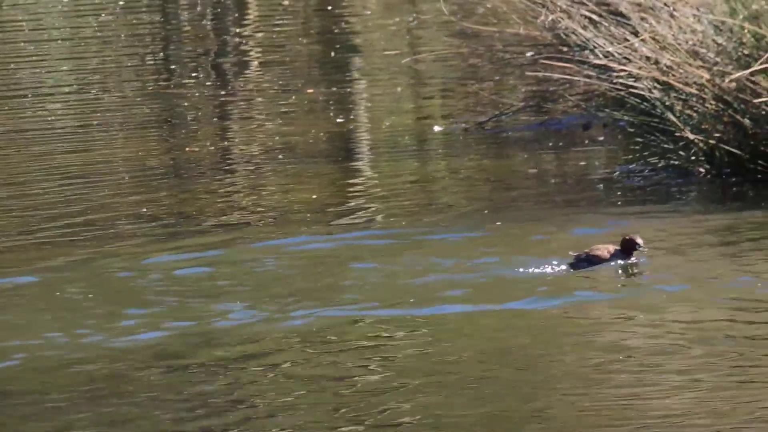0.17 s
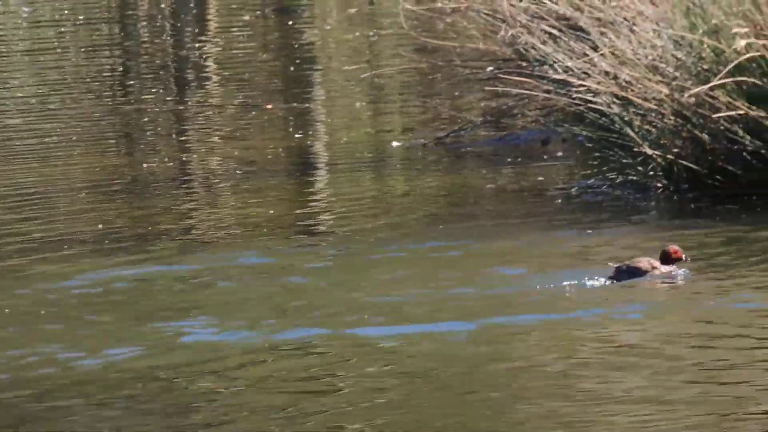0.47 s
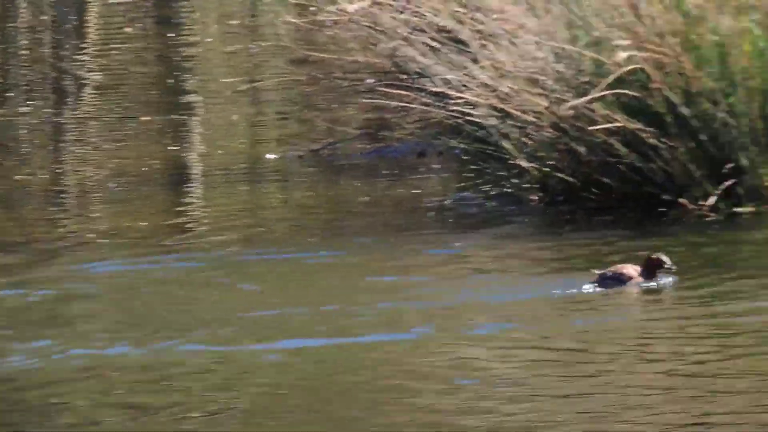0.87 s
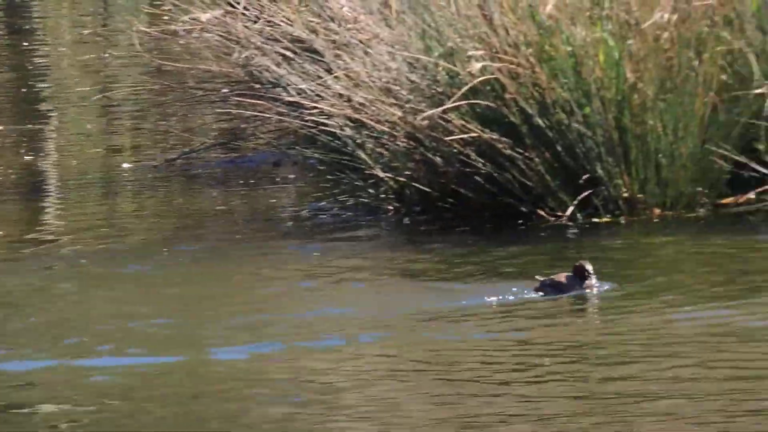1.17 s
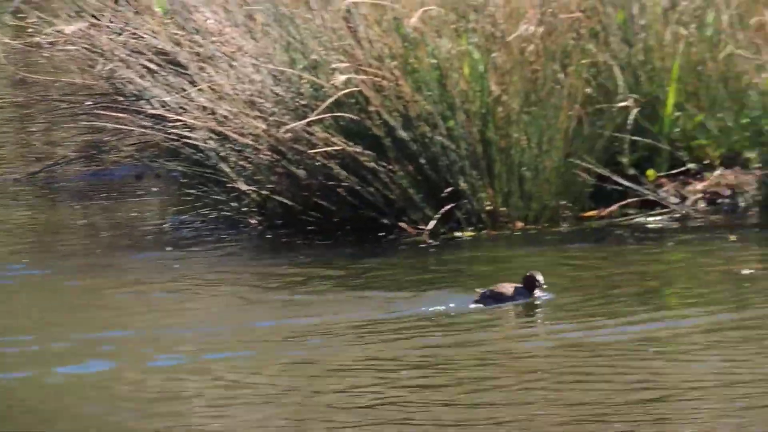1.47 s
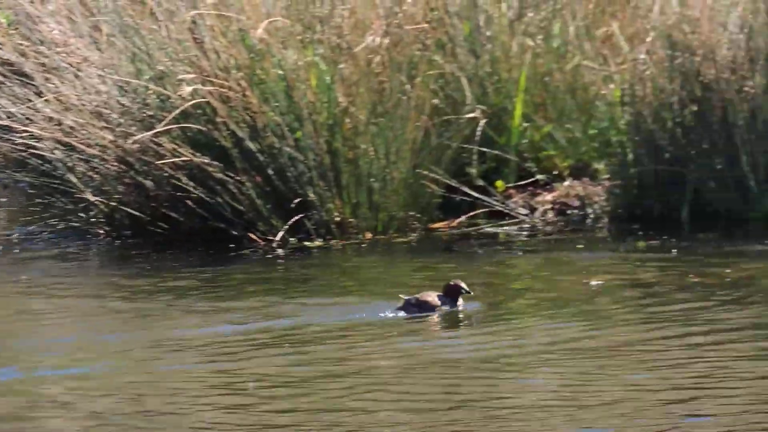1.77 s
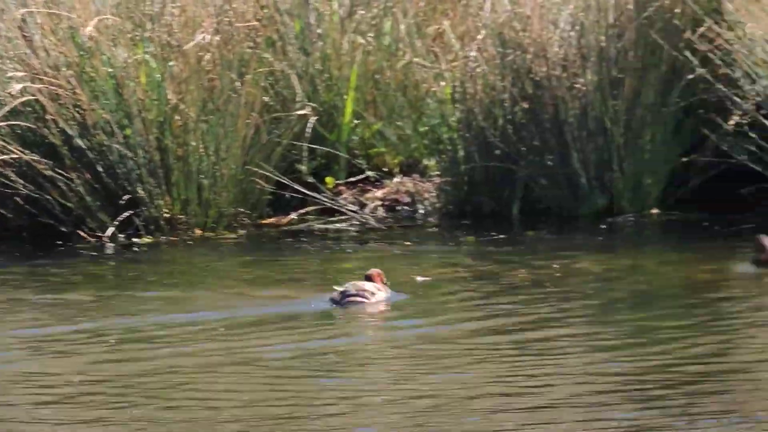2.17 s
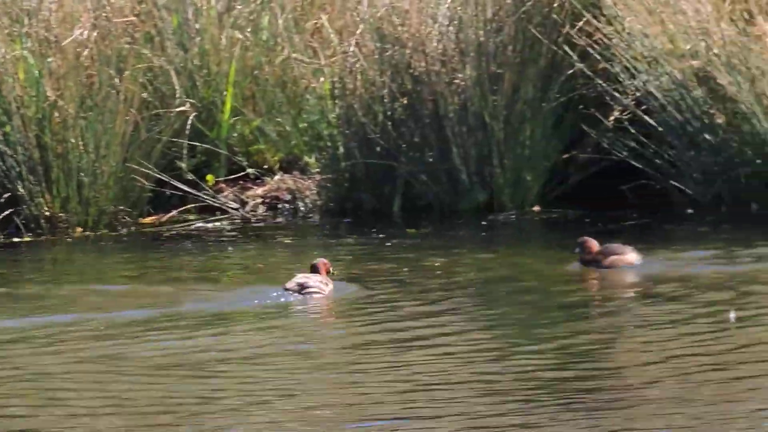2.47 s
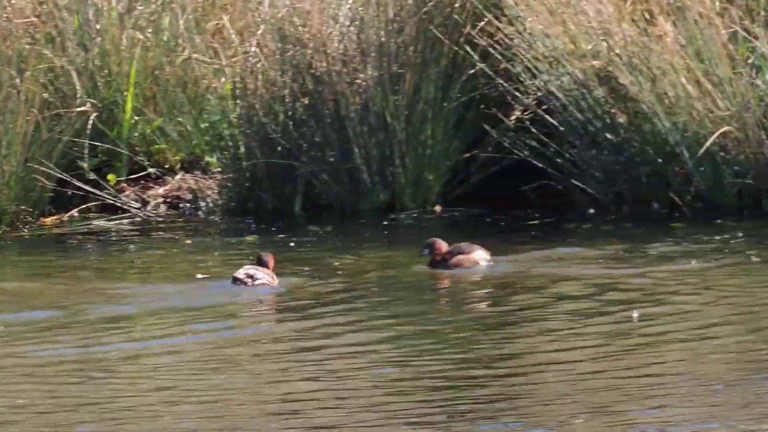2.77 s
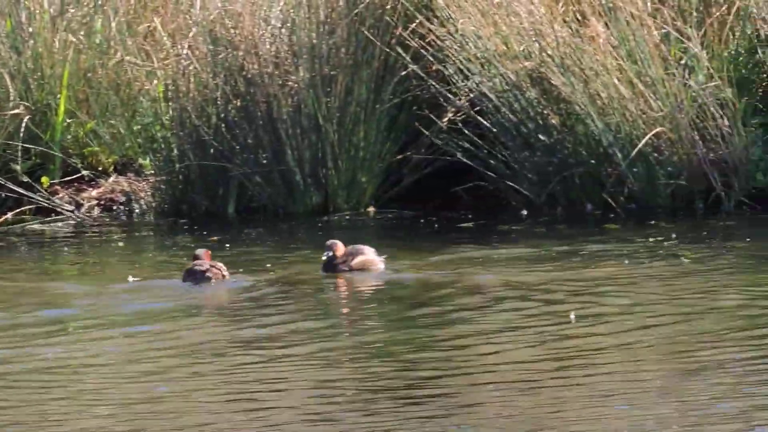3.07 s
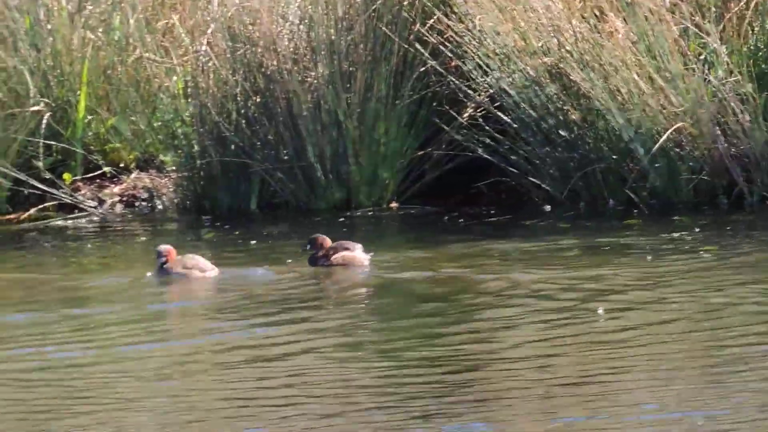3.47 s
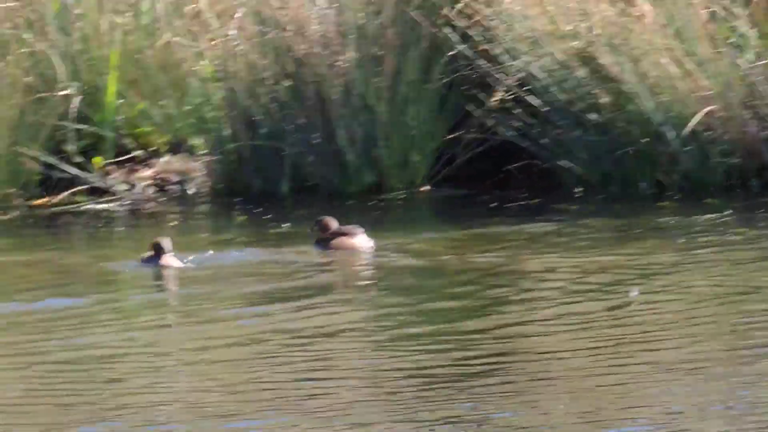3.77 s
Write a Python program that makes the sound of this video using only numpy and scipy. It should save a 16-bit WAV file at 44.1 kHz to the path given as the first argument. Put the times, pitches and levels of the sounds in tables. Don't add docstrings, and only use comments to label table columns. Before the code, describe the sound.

Two grebes trill a fast whinnying duet on a reedy pond, pause near the middle, then trill again to the end. Fainter birds join, distant traffic rumbles, and sharp plastic camera clicks sound close to the microphone.

```python
import sys
import numpy as np
from scipy import signal
from scipy.fft import rfft, irfft, next_fast_len
from scipy.io import wavfile
from scipy.ndimage import uniform_filter1d

SR = 44100
rng = np.random.default_rng(int(sys.argv[2]) if len(sys.argv) > 2 else 0)


def voltage_ratio(decibels):
    exponent = np.asarray(decibels, float) / 20
    return 10 ** exponent


def dump_mix(stems):
    frames = np.atleast_2d(stems).T
    limited = np.clip(frames, -1, 1)
    pcm = np.round(limited * 32767).astype(np.int16)
    wavfile.write(sys.argv[1], SR, pcm)


N = 173313


def unit(x):
    return x / np.sqrt(np.mean(x ** 2))


def walk(rate_hz):
    hold = int(SR / rate_hz)
    steps = np.repeat(rng.standard_normal(N // hold + 1), hold)
    return unit(uniform_filter1d(uniform_filter1d(steps, hold), hold)[:N])


def band(hz, width_hz):
    b, a = signal.iirpeak(hz, hz / width_hz, SR)
    return unit(signal.lfilter(b, a, rng.standard_normal(N)))


def response(points):
    p, size = np.array(points, float), next_fast_len(N + SR // 10)
    hz = np.arange(size // 2 + 1) * SR / size
    log_gain = np.interp(np.log(hz + 1), np.log(p[:, 0]), p[:, 1]) * np.log(10) / 20
    cepstrum = irfft(log_gain, size)
    cepstrum[1:size // 2] *= 2
    cepstrum[size // 2 + 1:] = 0
    return rfft(cepstrum), hz, size


def colour(x, points):
    log_spectrum, _, size = response(points)
    return irfft(rfft(x, size) * np.exp(log_spectrum), size)[..., :N]


# f/Hz, level/dB [dB per Hz]
TRAFFIC_SPECTRUM = [(20, 4), (55, 0.5), (130, -4), (220, -5.5), (800, 3), (1300, -10), (2900, -22),
                    (5200, -15), (9000, -24)]
# f/Hz, width/Hz, level/dB
ENGINE_DRONES = [(56.3, 10.6, -60.5), (81.7, 8.8, -59.5), (203, 5.6, -63), (230.6, 10, -69),
                 (346, 7.4, -63), (373.8, 8.4, -58), (566, 15, -60)]
TRAFFIC_DB, TRAFFIC_SIDE_DB = -45, -11.5


def traffic():
    roar, swell, sign = 0, walk(1.0), np.array([[1], [-1]])
    for hz in 25 * 2 ** np.arange(0, 9.1, .5):
        level = np.sqrt(hz) * voltage_ratio(.5 * swell + walk(8.7))
        side = voltage_ratio(TRAFFIC_SIDE_DB) * sign * band(hz, hz / 3)
        roar = roar + level * (band(hz, hz / 3) + side)
    roar = voltage_ratio(TRAFFIC_DB) * unit(colour(roar, TRAFFIC_SPECTRUM))
    drones = sum(voltage_ratio(db + 2 * walk(1)) * band(hz, width_hz) for hz, width_hz, db in ENGINE_DRONES)
    return roar + drones


# t/s, level/dB
TICKS = [
    (0.7048, -15.5),
    (0.7313, -18.5),
    (3.273, -20.5),
    (3.2853, -20.5),
]
# f/Hz, level/dB, t60/s
BODY_MODES = [(400, -12, .015), (1513, 0, .013), (3630, -12, .005), (5100, -6, .003), (8000, -8, .0015),
              (11500, -10, .001)]


def camera():
    out, t = np.zeros((2, N)), np.arange(SR // 20) / SR
    for start_s, db in TICKS:
        i = int(start_s * SR)
        for hz, mode_db, t60_s in BODY_MODES:
            detune = 1 + rng.standard_normal() / 40
            ring = voltage_ratio(db + mode_db - 60 * t / t60_s) * np.sin(2 * np.pi * hz * detune * t)
            port_db = np.array([[-5], [-4 + 2 * np.log2(hz / 1500)]])
            out[:, i:i + len(t)] += ring * voltage_ratio(port_db)
    return out


ROUGH_MOST = .19


def add_note(out, start_s, hz, env, partials_db, rough, bright, db):
    i, n = int(start_s * SR), min(len(hz), N - int(start_s * SR))
    rough = min(rough, ROUGH_MOST)
    wobble = uniform_filter1d(rng.standard_normal((2, 4096)), size=48, axis=1) * 7
    pitch_wobble, level_wobble = 1 + rough * wobble[:, :n] * np.array([[1 / 20], [1]])
    phase = 2 * np.pi * np.cumsum(hz[:n] * pitch_wobble) / SR
    gains = voltage_ratio(np.array(partials_db))
    note = 0
    for k, gain in enumerate(gains):
        note = note + gain * env[:n] ** (1 + bright * k) * np.sin((k + 1) * phase + k * k)
    out[i:i + n] += voltage_ratio(db) * note * level_wobble * np.sqrt(2 / np.sum(gains ** 2))


def arches(rows, partials_db, db, rise_s, fall_s, sag, flare, rough, bright):
    out, t = np.zeros(N), np.arange(-rise_s, fall_s, 1 / SR)
    env = np.clip(1 - (t / np.where(t < 0, rise_s, fall_s)) ** 4, 0, 1)
    arch = 1 - sag * t ** 2 / (1 + flare * t ** 2)
    for top_s, top_hz, level_db in rows:
        add_note(out, top_s - rise_s, top_hz * arch, env, partials_db, rough, bright, level_db + db)
    return out


def hooks(rows, partials_db, db, scoop, scoop_s, attack_s, release_s, rough):
    out = np.zeros(N)
    for start_s, length_s, hz, level_db, *over_db in rows:
        end_s = length_s + release_s
        t = np.arange(0, end_s, 1 / SR)
        env = np.clip(np.minimum(t / attack_s, (end_s - t) / release_s), 0, 1)
        overtone = np.arange(len(partials_db)) > 0
        tone_db = np.array(partials_db) + sum(over_db) * overtone
        pitch = hz * (1 - scoop * np.exp(-t / scoop_s))
        add_note(out, start_s, pitch, env, tone_db, rough, .1, level_db + db)
    return out


# t/s [top], f/Hz [top], level/dB
LOW_FAR_ARCHES = [(1.734, 755, -47), (1.778, 910, -50), (2.028, 803, -46.5), (2.083, 936, -52),
                  (2.155, 895, -42.5), (2.187, 960, -45.5), (2.249, 1310, -43), (2.316, 1190, -44.5),
                  (2.453, 985, -42.5), (2.517, 1040, -44.5), (2.588, 1010, -45), (2.654, 980, -43.5),
                  (2.722, 985, -43), (2.788, 990, -45.5), (2.856, 960, -48), (2.922, 957, -45),
                  (2.986, 915, -44), (3.052, 924, -44.5), (3.115, 900, -45), (3.18, 894, -46),
                  (3.244, 889, -45), (3.305, 870, -44), (3.37, 833, -48), (3.434, 843, -48),
                  (3.502, 834, -49), (3.572, 834, -47.5), (3.64, 834, -41), (3.718, 809, -44.5),
                  (3.797, 825, -44.5), (3.879, 802, -46)]
LOW_FAR_PARTIALS = [10, 11.5, 7.5, 2.5, 4.5, 6.5, 0.5, 4.5]


def low_far_bird():
    return arches(LOW_FAR_ARCHES, LOW_FAR_PARTIALS, db=-2, rise_s=0.02, fall_s=0.026,
                  sag=823, flare=840, rough=0.29, bright=0.81)


# t/s [top], f/Hz [top], level/dB
HIGH_FAR_ARCHES = [(.434, 1213, -45.5), (.507, 1195, -46), (0.579, 1228, -42.5), (0.649, 1210, -42.5),
                   (0.725, 1220, -42.5), (0.792, 1174, -46.5), (.864, 1187, -48), (.935, 1179, -46),
                   (1.006, 1200, -47), (1.076, 1207, -46), (1.146, 1188, -46), (1.219, 1185, -46),
                   (1.367, 860, -47.5), (1.44, 1212, -46), (1.52, 1197, -45), (1.607, 1190, -51),
                   (1.676, 1142, -49)]
ARCHING_PARTIALS = [7, 5, 6.5, 7, 6.5, 4, 0.5]


def high_far_bird():
    return arches(HIGH_FAR_ARCHES, ARCHING_PARTIALS, db=0.5, rise_s=.011, fall_s=0.015,
                  sag=875, flare=900, rough=.2, bright=.3)


# t/s [start], length/s, f/Hz, level/dB
WHISTLES = [(.14, 0.0085, 2720, -36.5), (.188, 0.011, 2576, -37), (.351, .016, 2550, -34.5),
            (.423, 0.02, 2550, -38.5), (2.035, 0.021, 2390, -43), (2.137, 0.0072, 2564, -37),
            (2.158, .011, 2650, -40), (2.195, 0.0077, 2670, -41), (2.215, 0.0075, 2520, -37.5),
            (2.232, 0.0074, 2700, -37.5), (2.277, 0.023, 2420, -44), (2.556, 0.011, 2600, -32),
            (2.623, 0.0092, 2585, -31)]
# t/s [start], length/s, f/Hz, level/dB
GLIDING_WHISTLE = [
    (1.918, .036, 1950, -38),
]
WHISTLING_PARTIALS = [0, -0.43]


def whistling_bird():
    short = hooks(WHISTLES, WHISTLING_PARTIALS, db=-7.5, scoop=-0.013, scoop_s=0.0025,
                  attack_s=0.00053, release_s=0.0017, rough=0.24)
    gliding = hooks(GLIDING_WHISTLE, WHISTLING_PARTIALS, db=-12, scoop=-0.087, scoop_s=0.037,
                    attack_s=0.0036, release_s=0.014, rough=.08)
    return short + gliding


# t/s [start], length/s, level/dB
HOOKED_NOTES = [(0.122, 0.015, -33), (0.199, 0.019, -35), (0.27, 0.024, -34.5), (0.338, 0.014, -41),
                (0.491, 0.02, -34.5), (0.563, 0.019, -35.5), (0.633, 0.02, -34), (0.696, 0.029, -32),
                (0.776, 0.018, -32.5), (0.848, 0.016, -33.5), (0.921, 0.021, -32), (0.992, 0.019, -30),
                (1.061, 0.02, -30), (1.134, 0.016, -30), (1.203, 0.017, -31.5), (1.278, 0.016, -37),
                (2.203, 0.011, -39), (2.337, 0.021, -33.5), (2.406, 0.023, -34), (2.475, 0.022, -31),
                (2.541, 0.015, -32.5), (2.609, 0.014, -32.5), (2.677, 0.022, -30.5), (2.745, 0.023, -31.5),
                (2.81, 0.022, -29), (2.878, 0.024, -30), (2.944, 0.021, -29.5), (3.01, 0.023, -32),
                (3.077, 0.021, -28.5), (3.141, 0.017, -29), (3.202, 0.016, -29.5), (3.268, 0.021, -31.5),
                (3.332, 0.0146, -33), (3.396, 0.017, -30.5), (3.463, 0.015, -31), (3.529, 0.015, -33.5),
                (3.599, 0.013, -38), (3.679, 0.012, -35.5), (3.755, 0.014, -38), (3.84, 0.015, -49)]
# t/s, f/Hz, overtone level/dB
HOOK_DRIFT = [(.1, 1635, -11), (0.619, 1605, -8), (.72, 1523, -7.5), (1.15, 1590, -3.5), (1.28, 1360, -2),
              (2.2, 1507, -14), (2.34, 1487, -7), (2.45, 1593, -4), (3.35, 1592, -3.5), (3.55, 1573, -4),
              (3.839, 1443, 5)]
HOOKING_PARTIALS = [4, 10.5, 8, -1.5, -2]
SHORT_HOOK_S = .0145


def hooking_bird():
    when, pitch, over = np.array(HOOK_DRIFT).T
    rows = [(s, length_s, np.interp(s, when, pitch), db, np.interp(s, when, over))
            for s, length_s, db in HOOKED_NOTES]
    full_rows = [r for r in rows if r[1] > SHORT_HOOK_S]
    short_rows = [r for r in rows if r[1] <= SHORT_HOOK_S]
    full = hooks(full_rows, HOOKING_PARTIALS, db=-9.5, scoop=0.237, scoop_s=0.00287,
                 attack_s=0.0032, release_s=0.0019, rough=0.18)
    short = hooks(short_rows, HOOKING_PARTIALS, db=-6.5, scoop=0.264, scoop_s=0.00615,
                  attack_s=0.0046, release_s=0.00062, rough=0.24)
    return full + short


# t/s [top], f/Hz [top], level/dB
NEAR_ARCHES = [(.103, 1305, -35.5), (0.177, 1310, -35), (0.25, 1298, -32.5), (0.322, 1316, -33),
               (0.397, 1288, -32), (0.472, 1098, -33), (0.544, 1172, -33.5), (0.613, 1143, -36),
               (0.686, 1118, -35.5), (0.756, 1065, -38.5), (0.827, 1075, -38.5), (0.898, 1054, -37),
               (0.972, 1070, -36), (1.043, 985, -37.5), (1.113, 1034, -35.5), (1.186, 1034, -35.5),
               (1.255, 1045, -34.5), (1.329, 972, -34), (1.409, 964, -35), (1.489, 1008, -35),
               (1.574, 1034, -33.5), (1.639, 893, -37.5),
               (2.1, 1297, -35.5), (2.269, 1252, -33), (2.383, 1176, -31.5), (2.489, 1260, -33.5),
                 (2.579, 1292, -33.5), (2.679, 1300, -33.5), (2.768, 1317, -33), (2.855, 1306, -32),
                 (2.946, 1317, -34), (3.034, 1333, -34.5), (3.123, 1354, -35.5), (3.207, 1351, -35),
                 (3.293, 1327, -35.5), (3.386, 1286, -33.5), (3.468, 1247, -35.5), (3.553, 1270, -35),
                 (3.641, 1247, -37), (3.734, 1250, -37), (3.831, 1080, -36), (3.92, 1100, -36)]


def arching_bird():
    return arches(NEAR_ARCHES, ARCHING_PARTIALS, db=-7.0, rise_s=.018, fall_s=.024,
                  sag=1600, flare=904, rough=.22, bright=0.21)


def place(x, pan_db, late_ms, mirror_db, mirror_ms):
    def delay(v, ms):
        return np.interp(np.arange(N) - ms * SR / 1000, np.arange(N), v)
    x = x - voltage_ratio(mirror_db) * delay(x, mirror_ms)
    return np.array([delay(x, late_ms) * voltage_ratio(pan_db / 2), x * voltage_ratio(-pan_db / 2)])


ECHO_DB, ECHO_T60_S, ECHO_GAP_S = -8.5, 0.42, 0.0043


def reed_echo(dry):
    t = np.arange(SR // 3) / SR
    tail = rng.standard_normal((2, len(t))) * voltage_ratio(-60 * t / ECHO_T60_S) * (t > ECHO_GAP_S)
    tail = tail / np.sqrt(np.sum(tail ** 2, 1))[:, None]
    return voltage_ratio(ECHO_DB) * signal.fftconvolve(dry, tail, axes=1)[:, :N]


# left minus right/dB, left port lag/ms, water mirror level/dB, mirror lag/ms
BIRD_PLACES = [
    (1.5, -0.011, -14.5, 0.934),
    (5.5, 0.075, -16, 0.864),
    (1.5, -0.088, -21, 1.1),
    (0.5, 0.0039, -12, 0.84),
    (0.5, -0.019, -23, 1.012),
]


def grebes():
    voices = [arching_bird(), high_far_bird(), low_far_bird(), hooking_bird(), whistling_bird()]
    dry = sum(place(voice, *where) for voice, where in zip(voices, BIRD_PLACES))
    return dry + reed_echo(dry)


def scene():
    return traffic() + camera() + grebes()


def top_cut(x):
    return signal.sosfilt(signal.butter(12, 14250, fs=SR, output="sos"), x)


# f/Hz, level/dB
LEFT_PORT = [(60, 9), (500, 7.5), (1000, 6.5), (1550, 11.5), (2300, 8), (3200, 6), (3600, 15), (4050, 6),
             (5000, 2.5), (5800, -15)]
# f/Hz, level/dB
RIGHT_PORT = [(700, 6.5), (1600, 4), (2600, 11), (3100, 11), (4200, 1.5), (5000, 5.5), (6400, 5),
              (9000, -5.5)]
# f/Hz, phase/rad
LEFT_LAG = [(1700, 0), (4200, 3), (5800, 6.3), (8200, 9.8)]
HISS_DB, TOP_HZ, START_S = -55, 14250, .1062


def record(dry):
    left, hz, size = response(LEFT_PORT)
    right = response(RIGHT_PORT)[0]
    left = left.real + 1j * (right.imag - np.interp(hz, *np.array(LEFT_LAG).T))
    x = irfft(rfft(dry, size) * np.exp([left, right]), size)[:, :N]
    x = x + voltage_ratio(HISS_DB) * rng.standard_normal((2, N))
    x = signal.sosfilt(signal.ellip(10, .2, 60, TOP_HZ, fs=SR, output="sos"), x)
    return top_cut(x * (np.arange(N) > START_S * SR))


dry = scene()
out = record(dry)
dump_mix(out)
```